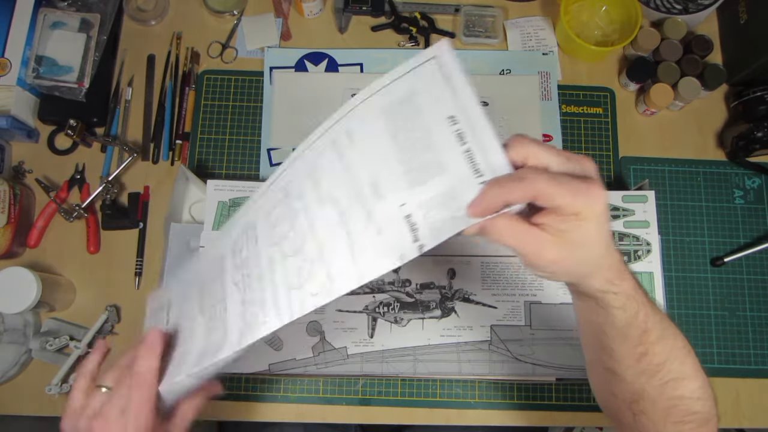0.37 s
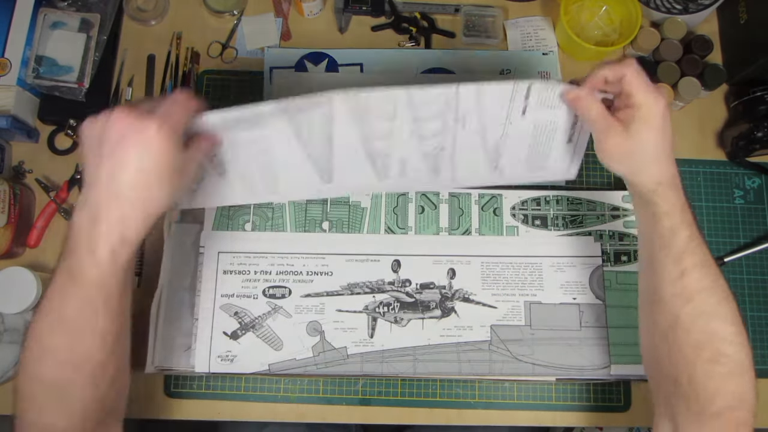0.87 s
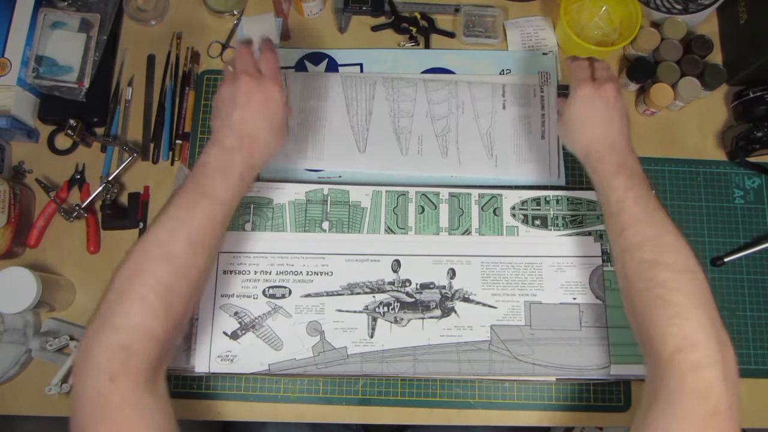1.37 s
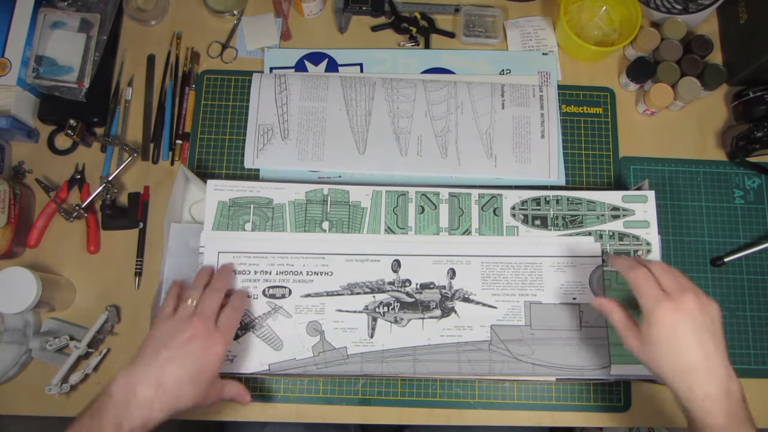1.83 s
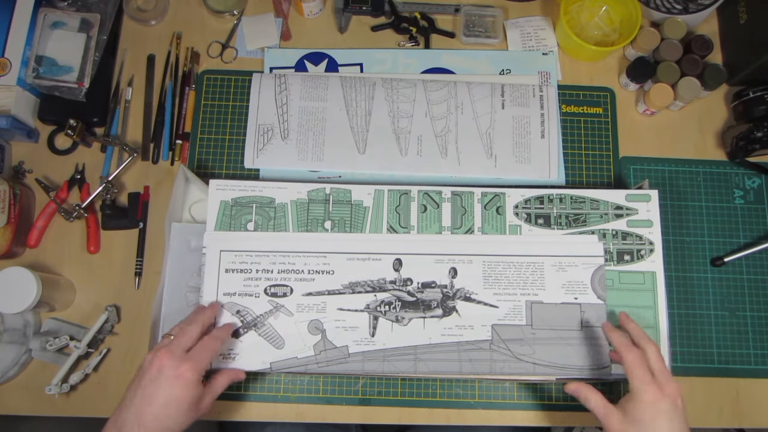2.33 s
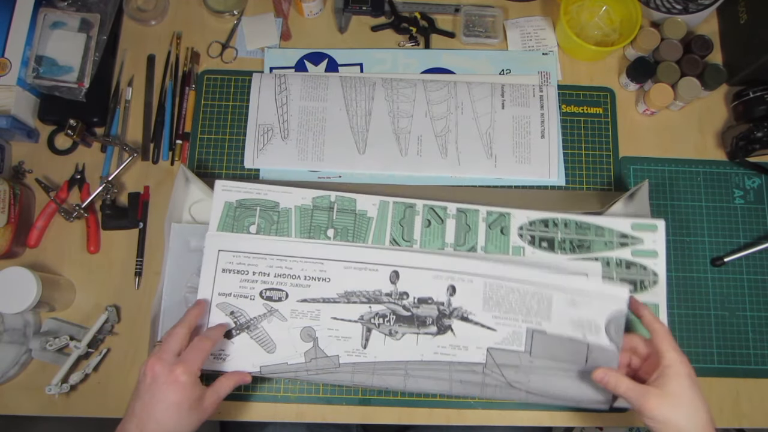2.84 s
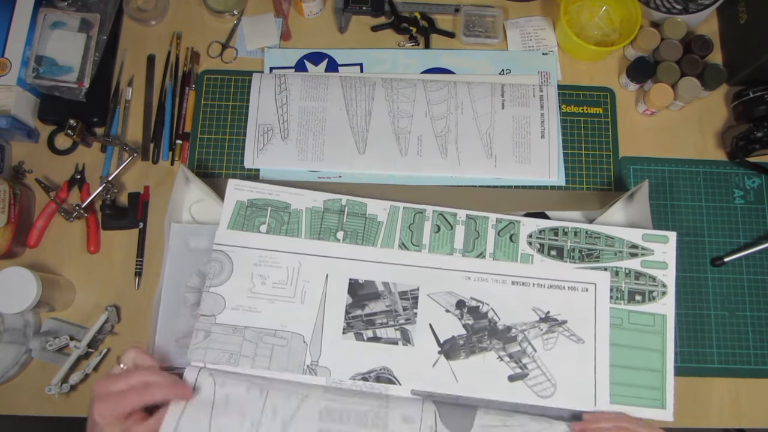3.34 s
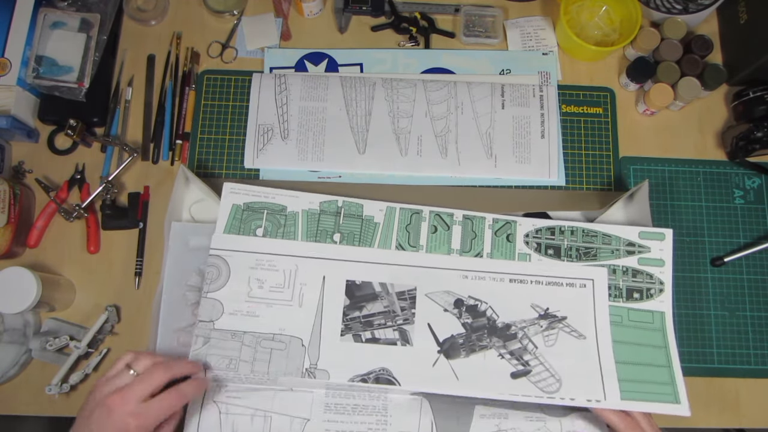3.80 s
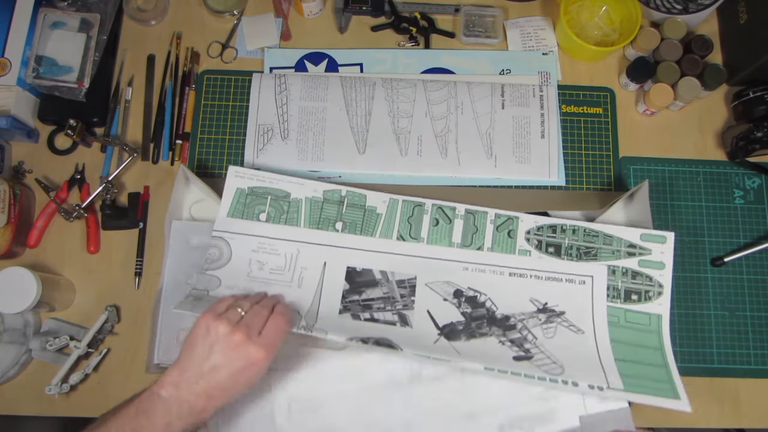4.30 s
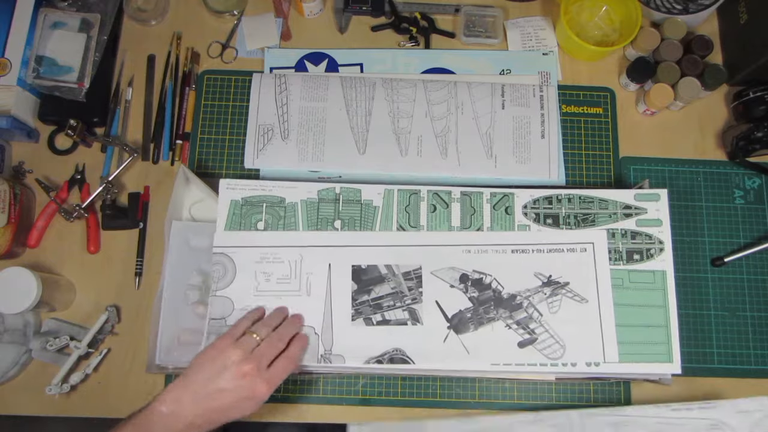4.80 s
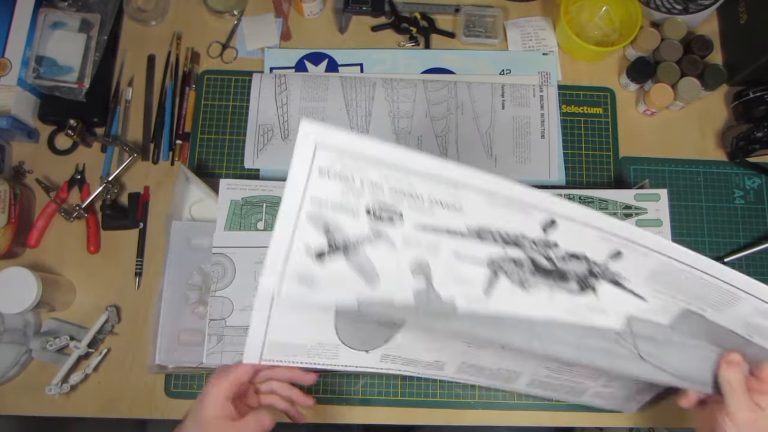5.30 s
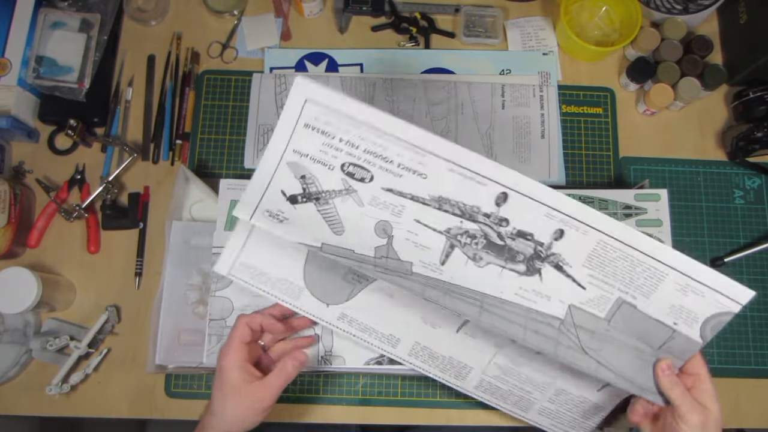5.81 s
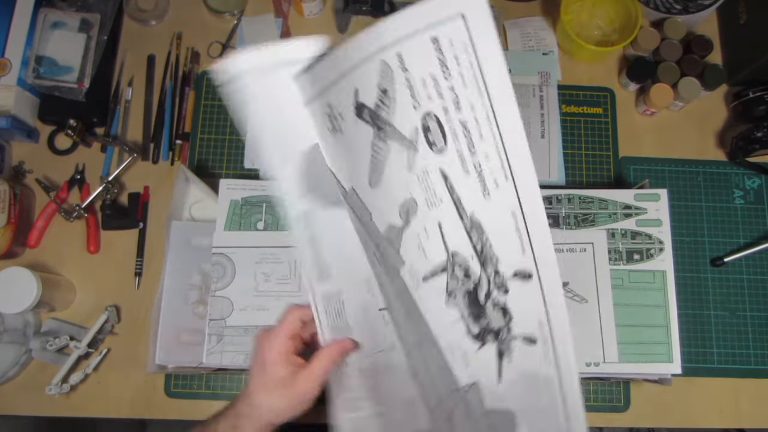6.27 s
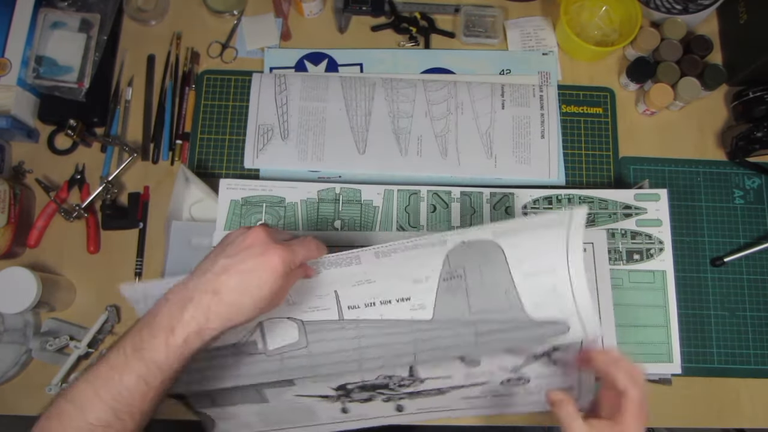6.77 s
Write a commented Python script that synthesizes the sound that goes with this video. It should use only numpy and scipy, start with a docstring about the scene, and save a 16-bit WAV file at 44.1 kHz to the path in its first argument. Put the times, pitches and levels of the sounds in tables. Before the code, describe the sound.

Big sheets of paper are handled close to the microphone on a desk. Bright crease snaps and hissing slides come first, fading to almost nothing but faint room hum. Then sheets are lifted and shuffled harder, with loud crackles, rumbling air and dull boxy knocks. A short slap and light rustling follow, a tiny squeak, and a final strong run of folding and crumpling.

```python
"""A desk in a small quiet room, where large paper sheets are lifted, unfolded and slid over each other.
Sliding fibres hiss in grains, the sheet flexes in a lower rustle, and creases snap as ringing clusters.
Sweeping sheets push low rumbling air at a close microphone and set the desk thrumming; folds slap a hollow
box, a finger squeaks once, and noise with faint steady tones lies beneath."""
import sys
import numpy as np
from scipy import signal
from scipy.io import wavfile

SR = 44100
rng = np.random.default_rng(int(sys.argv[2]) if len(sys.argv) > 2 else 0)


def elevation(decibels):
    """Turn decibel levels (scalar or array-like) into linear amplitude ratios."""
    levels = np.asarray(decibels, float)
    return 10 ** (levels / 20)


def wav_out(sig):
    """Save sig, one row per channel (or a flat mono array), as 16-bit PCM at SR to the path in sys.argv[1]."""
    wavfile.write(sys.argv[1], SR, np.round(np.clip(np.atleast_2d(sig).T, -1, 1) * 32767).astype(np.int16))


N = 304290  # samples, 6.9 s

# Smooth noise of the room, relative spectrum: pitch_hz, density_db
ROOM_TONE = [(88, -34), (150, -4.5), (226, -2.5), (275, -5), (745, -16), (941, -18), (1630, -95),
             (4410, -41), (6140, -21), (13700, -34), (16000, -31.5)]
ROOM_TONE_DB = -62.5  # rms in the mix
# Steady appliance tones: pitch_hz, level_db (relative; background() sets the height)
APPLIANCE_TONES = [(59.2, -57), (102.3, -65.5), (215.3, -74), (942.1, -81.5), (2056, -92), (3295, -90),
                   (4468, -84)]

# Air pushed by the sheets, relative spectrum: pitch_hz, density_db
AIR_SPECTRUM = [(7.1, -26.5), (12, 0.5), (25, 2), (70, -10.5), (110, -18.5), (139, -29.5), (173, -14),
                (250, -18.5), (320, -50), (550, -120)]
# A sheet swings past the microphone and brushes the desk: start_s, air_db, desk_thrum_db
PUFFS = [(0.0, -30, -41), (.09, -25.5, -38.5), (.38, -30.5, -41.5), (.68, -38, -42.5), (.85, -31, -50),
         (1.29, -37.5, -55), (2.3, -43, -54), (2.46, -29, -47), (2.73, -36, -46.5), (3.02, -21, -29),
         (3.21, -37, -39.5), (3.32, -24.5, -33), (3.5, -23.5, -41), (3.71, -23, -29), (4.07, -32, -45),
         (4.15, -28.5, -34), (4.3, -27.5, -33.5), (4.4, -31, -36), (4.48, -30, -34.5), (4.67, -29, -40),
         (5.01, -25, -39), (5.34, -26.5, -32.5), (5.5, -43, -51), (5.648, -34, -49), (5.78, -39, -50),
         (5.88, -36.5, -54), (6.03, -38, -47.5), (6.19, -37.5, -56), (6.28, -33, -46), (6.4, -27, -35.5),
         (6.65, -31.5, -43), (6.73, -26.5, -30.5), (6.9, -36, -36)]
PUFF_RISE_DB_PER_S, PUFF_FALL_DB_PER_S, STILL_AIR_DB = 331.5, 131.5, -49.5
DESK_HZ, DESK_WIDTH_HZ, STILL_DESK_DB = 105.7, 33, -62.5

# A fold slaps the hollow box under the sheets: start_s, strike_db, contact_s
BOX_SLAPS = [(1.225, -27, 0.0012), (1.23, -24, 0.001), (1.236, -28.5, 0.0005), (3.008, -19, 0.0022),
             (4.965, -32, 0.00046), (5.311, -24, 0.00024), (5.337, -23, 0.00037), (6.399, -21.5, 0.00067)]
# Modes of the box: pitch_hz, level_db, t60_s
BOX_MODES = [(264, -26.5, 0.13), (411, -4.5, 0.072), (496.5, -7, 0.19), (699, -13, 0.0337),
             (953, -10.5, 0.051)]
# A finger squeaks on the paper: time_s, pitch_hz, level_db (relative; squeak() sets the height)
SQUEAK = [(6.02, 1232, -47), (6.058, 1177, -42), (6.08, 1178, -38), (6.095, 1220, -44), (6.125, 1250, -53)]

# Creases giving way: start_s, panel_db (rms under the envelope), panel_ring_hz, crack_db (against
# the panel), dying_s (panel falls 60 dB)
SNAPS = [(0.028, -27.5, 1140, -1.5, .064), (0.065, -20.5, 1950, -20, 0.096), (.076, -10, 1470, -13, 0.063),
         (.151, -19.5, 1460, -10.5, .041), (.281, -38.5, 1140, -11, .055), (.381, -24, 1460, 1, 0.075),
         (.392, -13.5, 2100, 6, 0.099), (.409, -19, 1430, -19, 0.15), (0.434, -19.5, 1660, 2.5, 0.035),
         (.464, -22, 2140, -0.5, 0.04), (0.519, -21.5, 1350, 8.5, 0.13), (.553, -23, 1950, -10, .019),
         (.617, -24.5, 2060, 6.5, 0.044), (0.644, -21.5, 1950, 0, 0.14), (0.656, -24.5, 1310, -13, .021),
         (.684, -23.5, 1380, -21, 0.13), (.835, -33, 2000, -17.5, .09), (.862, -29.5, 1920, -22, 0.068),
         (1.324, -41.5, 1250, -15.5, 0.13), (1.356, -32, 1170, -15.5, .022),
         (1.368, -35.5, 900, -20.5, .08), (1.381, -24.5, 1490, -21.5, 0.063),
         (1.389, -30, 1700, -29, 0.058), (1.457, -48.5, 1290, 3, .11), (2.028, -42, 910, -10, .13),
         (2.051, -43.5, 980, -4, 0.075), (2.11, -45, 760, -10, .06), (2.45, -35, 830, -22, 0.21),
         (2.578, -41.5, 770, -17, 0.2), (2.72, -35, 550, 0, 0.047), (2.794, -32, 1420, -28, 0.036),
         (2.926, -29.5, 1050, -10, .068), (2.978, -25, 1470, -17, .015), (3.006, -22.5, 1160, 0.5, 0.068),
         (3.076, -26.5, 517, -2, .036), (3.094, -21.5, 1350, -30, 0.035), (3.179, -18.5, 1490, -21, .03),
         (3.205, -10, 730, -1.5, 0.0185), (3.243, -42.5, 1260, 13.5, .064), (3.265, -12, 1800, -5, 0.04),
         (3.275, -10, 1900, -6.5, 0.0126), (3.308, -21, 548, -4, .092), (3.318, -16, 896, -4.5, .05),
         (3.349, -22, 1960, -33, 0.062), (3.364, -28, 1900, -23, 0.034), (3.394, -19.5, 2050, -23, 0.029),
         (3.457, -32.5, 1030, -1.5, .069), (3.524, -29.5, 550, -1, .093), (3.6, -33.5, 1200, 6.5, .04),
         (3.572, -24, 1140, -3, 0.12), (3.635, -32.5, 510, 7, 0.089), (3.677, -25, 760, -7.5, 0.67),
         (3.7, -10, 930, -18.5, 0.023), (3.747, -17, 2180, -1.5, 0.078), (3.806, -21.5, 1280, -31, 0.17),
         (4.059, -42, 1210, 6, .2), (4.113, -24, 1420, -35, 0.062), (4.147, -25, 1110, -11.5, 0.15),
         (4.277, 0.5, 1310, -3.5, 0.03), (4.334, -30, 2120, 11, 0.12), (4.404, -21.5, 1300, -5, 0.13),
         (4.421, -18.5, 970, 0.5, 0.035), (4.49, -10.5, 1080, -29.5, 0.019),
         (4.505, -20.5, 1320, -5, 0.062), (4.556, -23, 1020, -1.5, 0.025), (4.643, -30, 1400, -8, 0.24),
         (4.685, -24.5, 970, -5.5, 0.1), (4.768, -25.5, 1870, 0.2, 0.094), (4.96, -24.5, 580, -21, .09),
         (4.967, -19, 1060, -7.5, .07), (4.999, -18, 1670, -9.5, 0.03), (5.335, -11.5, 540, -38, 0.062),
         (5.338, -23, 1380, -11, .05), (5.628, -40, 1130, 4, 0.65), (6.173, -43.5, 1240, -8, .15),
         (6.302, -36.5, 1360, -19, .2), (6.398, -17.5, 1240, -34, 0.13), (6.438, -21, 1100, -22, .029),
         (6.463, -11, 1276, 2.5, .036), (6.477, -26.5, 1170, -3, .14), (6.556, -28.5, 1220, -12, 0.095),
         (6.634, -23, 914, -15, 0.16), (6.647, -16, 1240, -21.5, 0.043), (6.691, -12.5, 1130, -18.5, 0.032),
         (6.715, -18, 560, -8.5, 0.073), (6.739, -11.5, 1570, -11, 0.034), (6.754, -16, 1040, -35, 0.023),
         (6.866, -24.5, 1320, -17, .022)]
LONGEST_SWELL_S = 0.0022  # rise of a snap with a quiet crack
SUDDEN_DB = -8            # crack level around which snaps turn abrupt

# Strokes of sheet over sheet: start_s, length_s, hiss_start_db, hiss_end_db (6.5 to 15.5 kHz), flex_db
STROKES = [(0.0, 0.096, -40.5, -32.5, -31.5), (0.081, 0.15, -35, -40.5, -33),
           (0.244, 0.06, -50.5, -50.5, -44.5), (0.343, .033, -54.5, -37.5, -44.5),
           (0.384, .12, -25, -43, -32.5), (0.518, 0.1, -39, -42, -43.5), (.605, 0.047, -38.5, -30, -40.5),
           (0.667, .09, -28.5, -50, -40.5), (0.756, .075, -54, -48.5, -55), (0.829, .3, -43, -58.5, -46),
           (1.125, .105, -53, -52, -53.5), (1.235, 0.13, -59.5, -46, -49), (1.356, 0.12, -48.5, -72, -45),
           (2.009, 0.243, -62, -54.5, -55), (2.264, 0.19, -52, -41, -47), (2.47, 0.18, -63, -55, -49.5),
           (2.627, .065, -39.5, -60, -43), (2.691, 0.063, -46.5, -39.5, -42.5), (2.79, .15, -56, -32, -37),
           (2.947, 0.089, -36.5, -44.5, -34), (3.058, .096, -50, -37, -34.5), (3.146, 0.12, -43, -45, -32),
           (3.263, 0.22, -30.5, -51.5, -34), (3.503, 0.146, -51.5, -43, -35),
           (3.641, 0.055, -57, -30.5, -33), (3.738, .04, -34, -51.5, -28.5),
           (3.772, 0.133, -48, -41.5, -33), (3.916, .1, -45, -57.5, -35.5), (4.024, .055, -60, -48, -43),
           (4.083, .185, -42.5, -40.5, -33), (4.274, .286, -38, -36.5, -30),
           (4.555, .24, -35.5, -42.5, -34.5), (4.8, 0.158, -45.5, -47.5, -37.5),
           (4.966, 0.028, -31.5, -48, -25.5), (4.992, 0.063, -50.5, -53, -34),
           (5.058, 0.138, -59, -58, -48.5), (5.211, 0.14, -47.5, -66.5, -50.5),
           (5.323, 0.089, -49.5, -40.5, -41.5), (5.432, .09, -42, -45, -40.5), (5.519, .511, -49, -42, -42),
           (6.037, 0.072, -48, -49, -44.5), (6.104, .226, -45, -45, -47.5), (6.326, 0.1, -43.5, -39, -41),
           (6.467, 0.031, -25.5, -43.5, -31), (6.495, 0.14, -43.5, -72, -44.5),
           (6.634, .13, -28, -33.5, -28), (6.791, 0.12, -34.5, -39, -34.5)]
GRIP_S = 0.006  # time for a stroke to climb its last 20 dB
HISS_STOP_DB_PER_S, FLEX_STOP_DB_PER_S = 900.5, 251.5  # sliding stops at once, the sheet settles slower
FLEX_FOLLOWS = 0.57  # share of the hiss's swing within a stroke
REST_HISS_DB, REST_FLEX_DB = -72, -65  # sheets at rest
CRACKLES_PER_S, CRACKLE_DB = 120, 6.5  # mean-drift rate at -34 dB flexing; largest swell before shaping
# Flexing sheet, relative spectrum: pitch_hz, density_db
FLEX_SPECTRUM = [(88, -34.5), (150, -0.5), (320, -5), (442, 4.5), (611, 1), (1020, 3.5), (2040, -4.5),
                 (2450, -9.5), (3240, -9.5), (6000, -13.5), (7800, -49), (13200, -120)]
# Sliding fibres, relative spectrum: pitch_hz, density_db
SLIDE_SPECTRUM = [(880, -47), (1500, -7.5), (2250, -6), (3310, -4.5), (3620, -2.5), (4920, 1.5),
                  (6960, -2.5), (11800, -5.5), (15100, -10), (16000, -19)]
# Lighter, faster sliding tilts the hiss upward: time_s, tilt_db_per_octave
BRIGHTNESS = [(0.0, -2.3), (.44, -2.5), (.6, -4.5), (.9, -1.5), (2.27, -1), (2.42, 0), (3.03, -4),
              (3.15, -1.2), (3.92, -8.5), (4.64, -2), (4.96, -5), (5.3, -0.5), (5.61, -5.5), (6.05, -1.5),
              (6.1, 15), (6.2, -0.2), (6.6, -8), (6.66, 1)]

ROOM_T60_S, ROOM_DB, WALL_CUT_HZ = 0.048, -4, 2800
# Resonances of desk top and microphone housing: pitch_hz, width_hz, lift_db
HOUSING = [(383, 110, 5), (1208, 355, 4), (1950, 250, 2.5), (3320, 750, 2), (3665, 250, -13),
           (4500, 1400, -1.5), (6260, 2000, -5), (8530, 830, 3.5), (11240, 760, 3.5)]


def rms_one(x):
    """Scales to rms 1."""
    return x / np.sqrt(np.mean(x ** 2) + 1e-20)


def drift(rate_hz):
    """Slow chance: noise through two equal one-pole low-passes at SR / 20, run in and set to rms 1."""
    r = np.exp(-40 * np.pi * rate_hz / SR)
    noise = rng.standard_normal(N // 20 + 2002)
    slow = signal.lfilter([1], [1, -2 * r, r * r], noise)[2000:]
    return np.interp(np.arange(N) / 20, np.arange(len(slow)), rms_one(slow))


def resonance(x, hz, width_hz):
    """Two-pole band-pass with gain 1 on top."""
    r = np.exp(-np.pi * width_hz / SR)
    poles = [1, -2 * r * np.cos(2 * np.pi * hz / SR), r * r]
    return signal.lfilter(np.array([1, 0, -1]) * (1 - r * r) / 2, poles, x)


def band(x, low_hz, high_hz):
    """Butterworth band-pass."""
    return signal.sosfilt(signal.butter(2, [low_hz, high_hz], "band", fs=SR, output="sos"), x)


def in_time(rows):
    """Table columns read at every sample."""
    s, *columns = np.transpose(rows)
    return [np.interp(np.arange(N) / SR, s, c) for c in columns]


def grains(size, spread_db):
    """Fibres catching and letting go: impulses of random sign with a long tail of large ones."""
    size_db = spread_db * np.minimum(rng.exponential(1, size), 6)
    return elevation(size_db) * rng.choice([-1, 1], size)


def coloured(source, spectrum, patchy_db, rate_hz, tilt_db=0):
    """Third-octave bands of two sources dealt in turn, each band with its level and flicker; rms 1."""
    hz, level_db = np.transpose(spectrum)
    edges = np.geomspace(hz[0], hz[-1], int(3 * np.log2(hz[-1] / hz[0])) + 2)
    out, together = 0, drift(rate_hz)
    for k, (low, high) in enumerate(zip(edges, edges[1:])):
        centre = np.sqrt(low * high)
        band_db = np.interp(np.log(centre), np.log(hz), level_db)
        band_db = band_db + tilt_db * np.log2(centre / 9500)  # tilt pivots at 9.5 kHz
        flicker_db = patchy_db * (0.76 * together + drift(rate_hz))
        out = out + elevation(band_db + flicker_db) * band(source[k % 2], low, high)
    return rms_one(out)


def peaked(start_s, end_s, start_db, end_db, rise_db_per_s, fall_db_per_s, rest_db):
    """Level of the loudest of many gestures: each rises to its start, runs straight to its end, falls."""
    t = np.arange(0, N / SR + .002, .001)[:, None]  # one row per millisecond, one column per gesture
    along = np.clip((t - start_s) / np.maximum(end_s - start_s, 1e-4), 0, 1)
    db = start_db + (end_db - start_db) * along
    db = db - rise_db_per_s * np.maximum(start_s - t, 0)
    db = db - fall_db_per_s * np.maximum(t - end_s, 0)
    return np.interp(np.arange(N) / SR, t[:, 0], np.maximum(db.max(axis=1), rest_db))


def background():
    """Smooth room tone with a few faint, slightly wavering appliance tones."""
    t = np.arange(N) / SR
    tones = 0
    for hz, db in APPLIANCE_TONES:
        waver = elevation(db + 9.5 + 0.71 * drift(4.0))
        tones = tones + waver * np.sin(2 * np.pi * (hz * t + rng.random()))
    noise = coloured(rng.standard_normal((2, N)), ROOM_TONE, patchy_db=1.5, rate_hz=12.0)
    return elevation(ROOM_TONE_DB) * noise + tones


def room(x):
    """Reflections from eight feedback delays, duller on every round, stepped block by block."""
    out, dull = np.zeros(N), np.exp(-2 * np.pi * WALL_CUT_HZ / SR)
    lags = (rng.uniform(0.0067, .03, 8) * SR).astype(int)
    for k, lag in enumerate(lags):
        loop, gain, state = x.copy(), elevation(-60 * lag / SR / ROOM_T60_S), [0.]
        for i in range(lag, N, lag):
            back, state = signal.lfilter([gain * (1 - dull)], [1, -dull], loop[i - lag:i], zi=state)
            loop[i:i + lag] += back[:N - i]
        out += (loop - x) * (-1) ** k  # alternate signs, echoes only
    return out / np.sqrt(8)


def pushed_air():
    """Each puff of low noise builds quickly and ebbs more slowly; the resonant desk top thrums under it."""
    s, air_db, thrum_db = np.transpose(PUFFS)
    air_db = peaked(s, s, air_db, air_db, PUFF_RISE_DB_PER_S, PUFF_FALL_DB_PER_S, STILL_AIR_DB)
    thrum_db = peaked(s, s, thrum_db, thrum_db, PUFF_RISE_DB_PER_S, PUFF_FALL_DB_PER_S, STILL_DESK_DB)
    air = coloured(rng.standard_normal((2, N)), AIR_SPECTRUM, patchy_db=2.5, rate_hz=5.0)
    thrum = resonance(rng.standard_normal(N), DESK_HZ, DESK_WIDTH_HZ)
    thrum = resonance(thrum, DESK_HZ, DESK_WIDTH_HZ)
    return elevation(air_db) * air + elevation(thrum_db) * rms_one(thrum)


def box_slaps():
    """A short bump of force, softer the longer the contact, sets the modes of the box ringing."""
    force, out = np.zeros(N), 0
    for s, db, contact_s in BOX_SLAPS:
        bump = np.hanning(int(contact_s * SR) + 3)
        force[round(s * SR):][:len(bump)] = elevation(db) * 2 * bump / bump.sum()
    for hz, db, t60_s in BOX_MODES:
        r, w = elevation(-60 / (t60_s * SR)), 2 * np.pi * hz / SR
        mode = signal.lfilter([0, np.sin(w)], [1, -2 * r * np.cos(w), r * r], force + 1e-18)
        out = out + elevation(db) * mode
    return out


def squeak():
    """Regular stick-slip of a finger: a slightly rough, gliding sine that fades at both ends."""
    hz, db = in_time(SQUEAK)
    t = np.arange(N) / SR
    fade = np.clip(np.minimum(t - SQUEAK[0][0], SQUEAK[-1][0] - t) / 0.012, 0, 1)
    rough = elevation(db + 1.5 + 3.7 * drift(40))
    return fade * rough * np.sin(2 * np.pi * np.cumsum(hz) / SR)


def snaps():
    """Each snap is a cluster of grains that swells and dies: it rings the freed panel and cracks above."""
    out, t = np.zeros(N + SR), np.arange(SR // 4) / SR
    for s, panel_db, hz, crack_db, dying_s in SNAPS:
        # the louder the crack, the more abrupt the opening
        swell_s = LONGEST_SWELL_S / (1 + elevation(2.6 * (panel_db + crack_db - SUDDEN_DB)))
        rise = np.minimum(t / max(swell_s, .0002), 1)
        after = np.maximum(t - swell_s, 0) / max(dying_s, .005)
        slow, fast = rise * elevation(-60 * after), rise ** 2 * elevation(-95 * after)  # the treble dies first
        cluster = grains(len(t), 2.64)
        cluster[int(swell_s * SR)] = elevation(17.5) * np.exp(-swell_s / 0.002)  # click, largest if sudden
        body = resonance(cluster * slow, hz, 0.068 * hz)
        body = body + 0.36 * band(cluster * slow, 0.34 * hz, 1.79 * hz)
        crack = band(cluster * fast, 2600, 5600)
        sizzle = band(cluster * fast, 7000, 14500)
        levels = elevation(panel_db + np.array([0.0, crack_db, crack_db - 12.0]))
        at = round(s * SR)
        for part, level, shape in zip((body, crack, sizzle), levels, (slow, fast, fast)):
            match = np.sqrt(np.sum(shape ** 2) / np.sum(part ** 2))  # energy of the envelope
            out[at:at + len(t)] += level * part * match
    return out[:N]


def handling():
    """Levels of hiss and flexing; the flexing shares part of each stroke's rise or fall."""
    s, length, start_db, end_db, flex_db = np.transpose(STROKES)
    swing_db, grip = FLEX_FOLLOWS * (end_db - start_db) / 2, 20 / GRIP_S
    hiss_db = peaked(s, s + length, start_db, end_db, grip, HISS_STOP_DB_PER_S, REST_HISS_DB)
    flex_db = peaked(s, s + length, flex_db - swing_db, flex_db + swing_db, grip,
                     FLEX_STOP_DB_PER_S, REST_FLEX_DB)
    return hiss_db, flex_db


def crackling(flex_db):
    """Tiny wrinkles let go in clumps, more often as the sheet flexes harder; each swells the grains."""
    rate = CRACKLES_PER_S * elevation(.6 * (flex_db + 34) + 5 * drift(8))
    born = rng.random(N) < rate / SR
    sizes = born * elevation(CRACKLE_DB - 2.5 * rng.random(N))
    r = np.exp(-1 / (0.0025 * SR))  # each swell decays over 2.5 ms
    return 1 + signal.lfilter([1], [1, -r], sizes + 1e-18)


def flexing(flex_db, wrinkles):
    """The bending sheet rustles: very uneven grains, swollen by wrinkles, in the sheet's lower spectrum."""
    source = grains((2, N), 3.84) * wrinkles ** 0.54
    return elevation(flex_db) * coloured(source, FLEX_SPECTRUM, patchy_db=1.6, rate_hz=21.4)


def sliding(hiss_db, wrinkles):
    """Fibres rubbing past each other hiss: more even grains, brighter or duller with the sliding."""
    source = grains((2, N), 1.6) * wrinkles ** 0.44
    tilt_db = in_time(BRIGHTNESS)[0]
    hiss = coloured(source, SLIDE_SPECTRUM, patchy_db=1.36, rate_hz=62, tilt_db=tilt_db)
    return elevation(hiss_db) * hiss / np.std(band(hiss, 6500, 15500))


def scene():
    """Paper, box and squeak share the room; pushed air acts on the microphone directly."""
    hiss_db, flex_db = handling()
    wrinkles = crackling(flex_db)
    hiss = sliding(hiss_db, wrinkles)
    paper = flexing(flex_db, wrinkles) + snaps() + box_slaps() + squeak()
    reflections = elevation(ROOM_DB) * room(paper + 0.32 * hiss)
    return (paper + hiss + reflections + pushed_air() + background())[None]


def low_pass(x):
    """Removes everything above the highest recorded frequency."""
    return signal.sosfilt(signal.butter(12, 16750, fs=SR, output="sos"), x)


def record(dry):
    """Desk and housing lift or dip a few bands, then peaks beyond full scale overload."""
    for hz, width_hz, lift_db in HOUSING:
        dry = dry + (elevation(lift_db) - 1) * resonance(dry, hz, width_hz)
    mix = np.clip(elevation(-2.5) * dry, -1, 1)
    return low_pass(mix)


dry = scene()
out = record(dry)
wav_out(out)
```